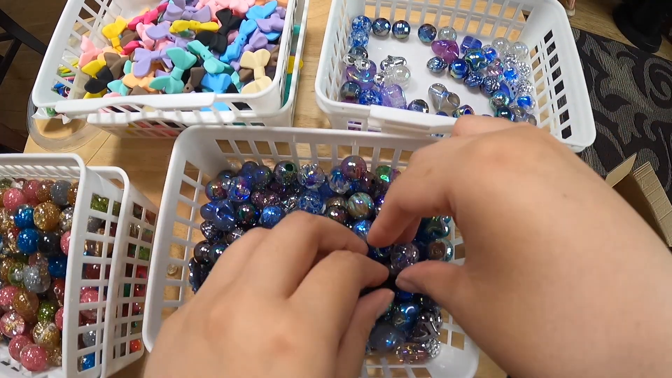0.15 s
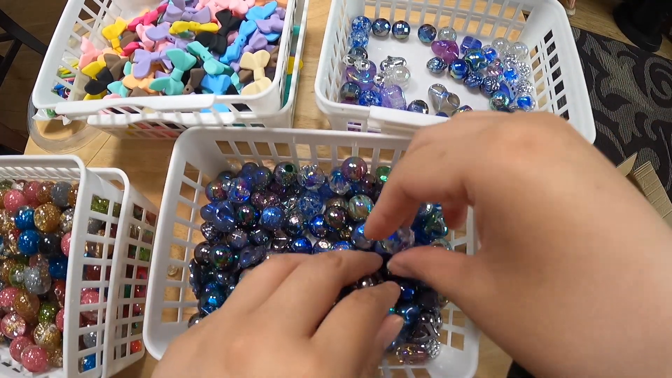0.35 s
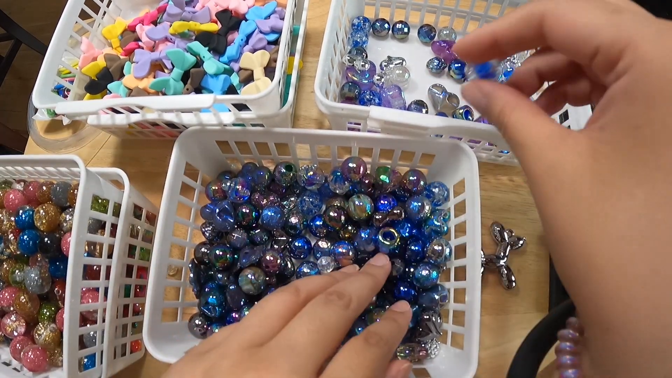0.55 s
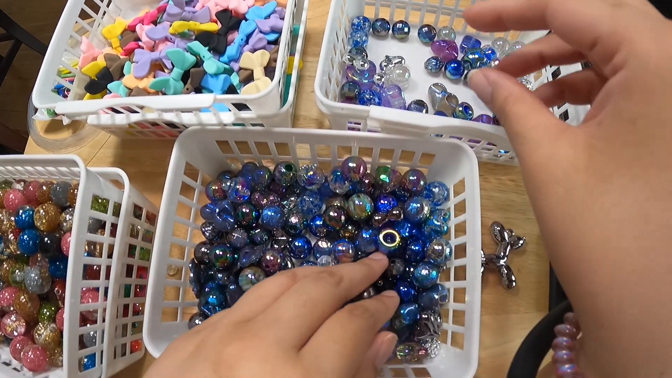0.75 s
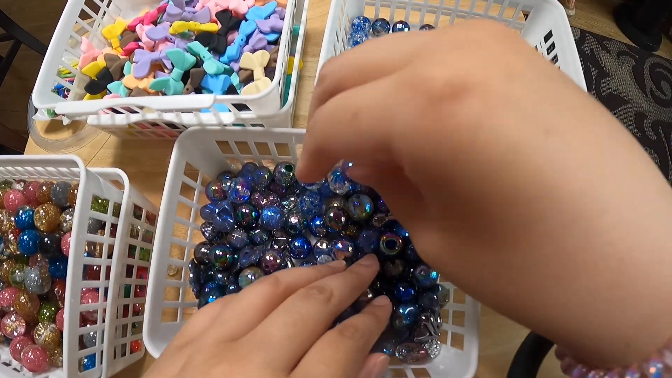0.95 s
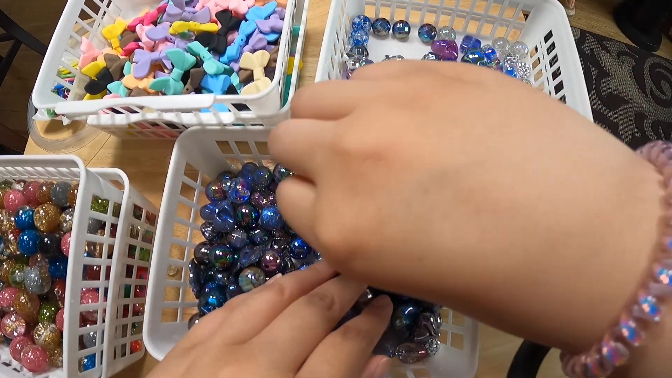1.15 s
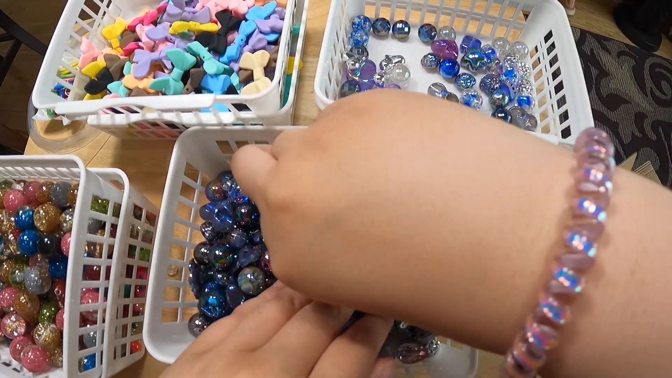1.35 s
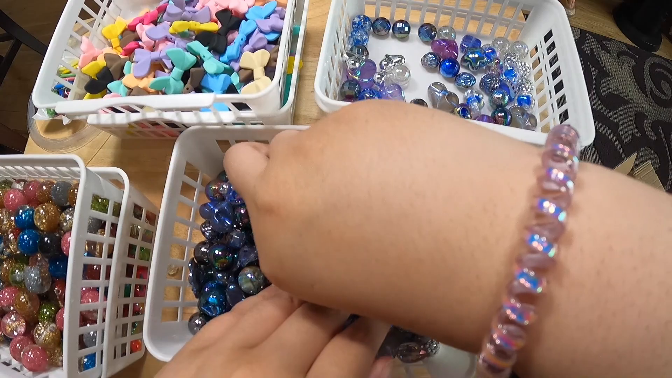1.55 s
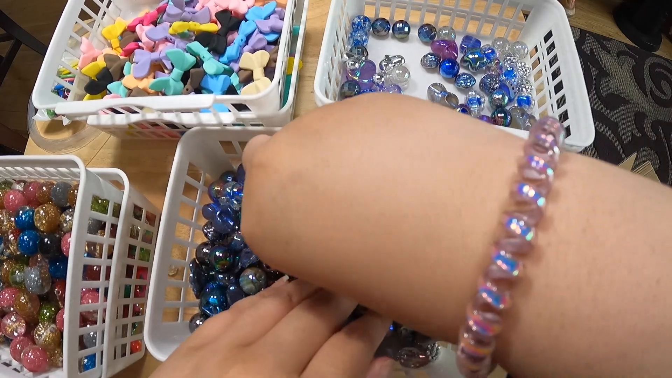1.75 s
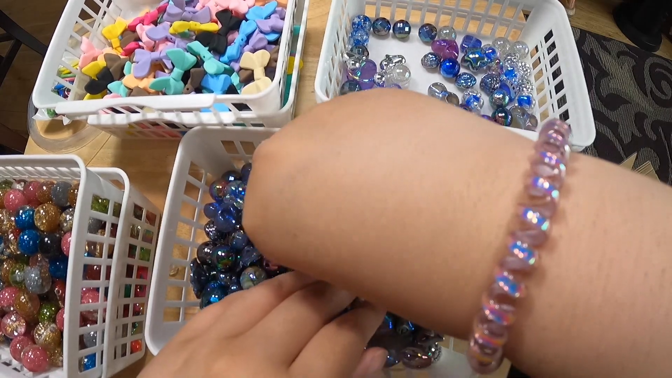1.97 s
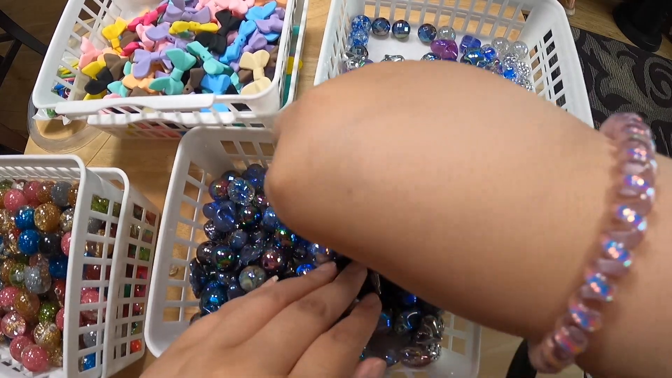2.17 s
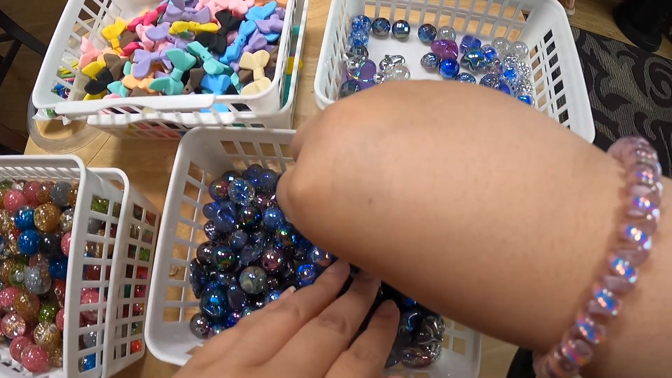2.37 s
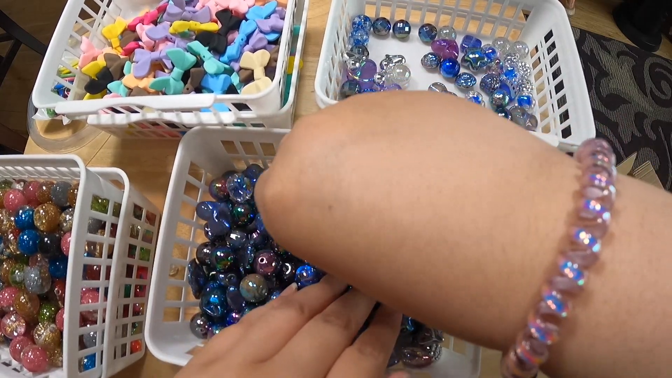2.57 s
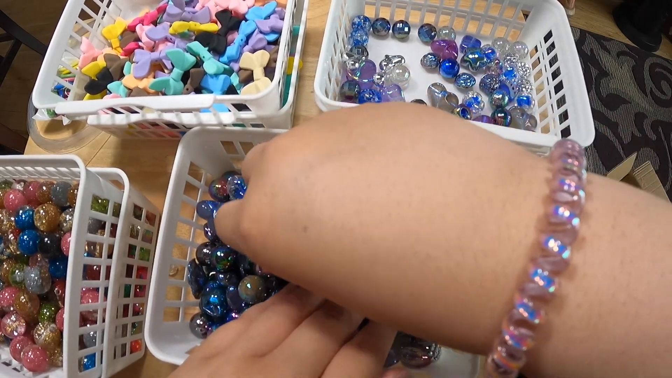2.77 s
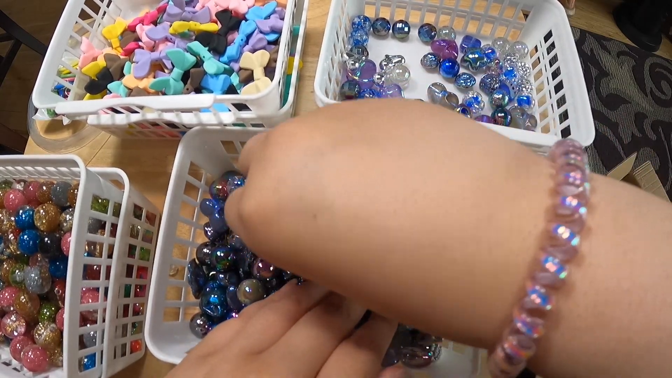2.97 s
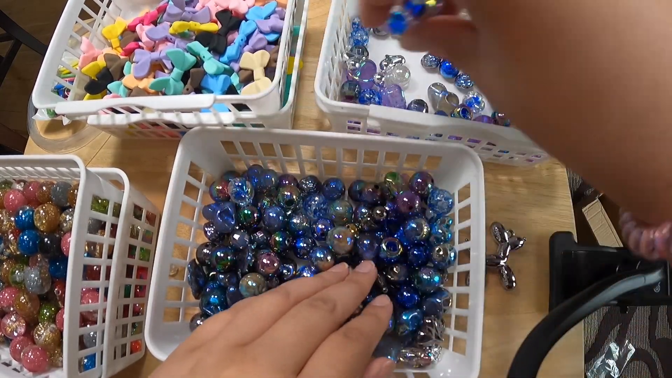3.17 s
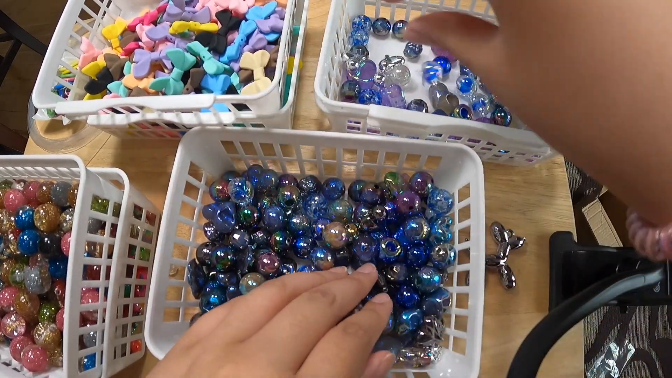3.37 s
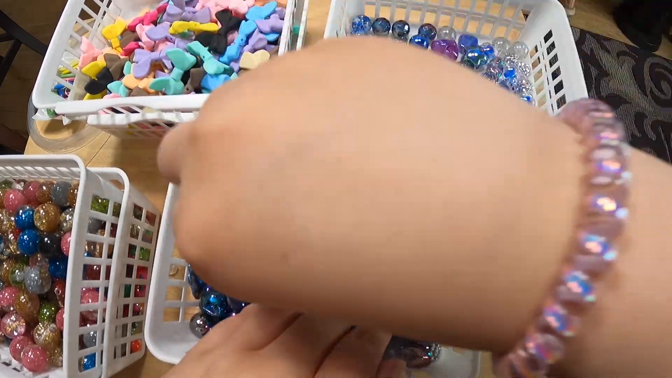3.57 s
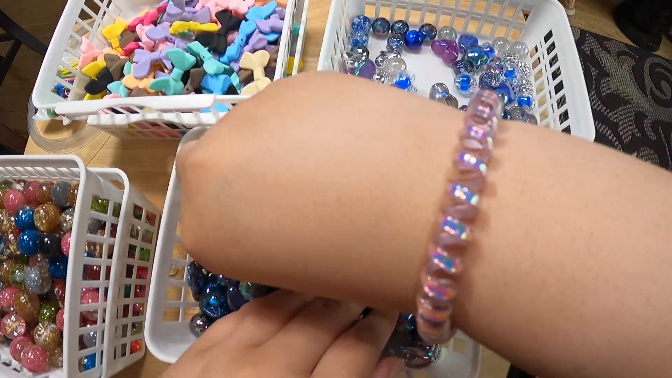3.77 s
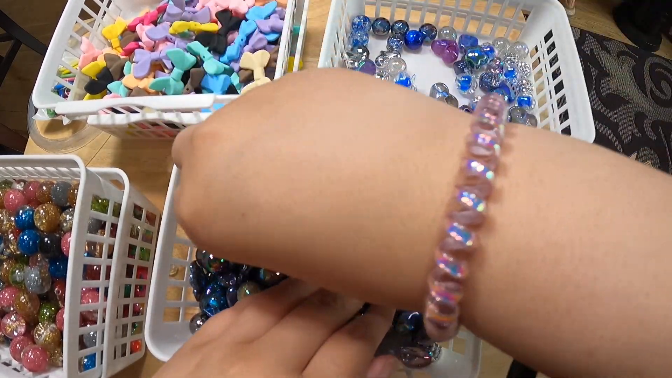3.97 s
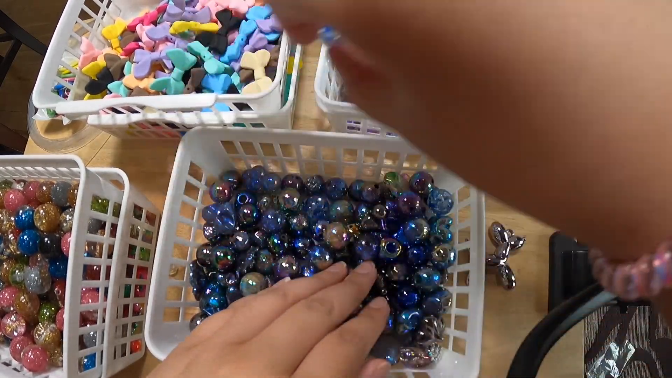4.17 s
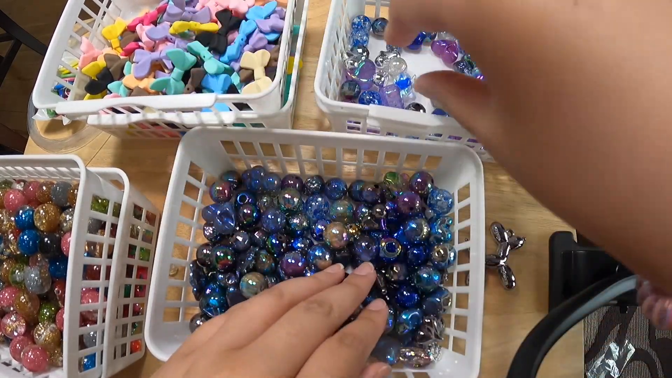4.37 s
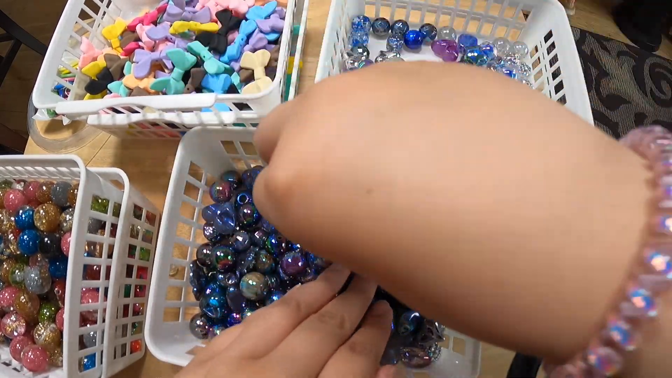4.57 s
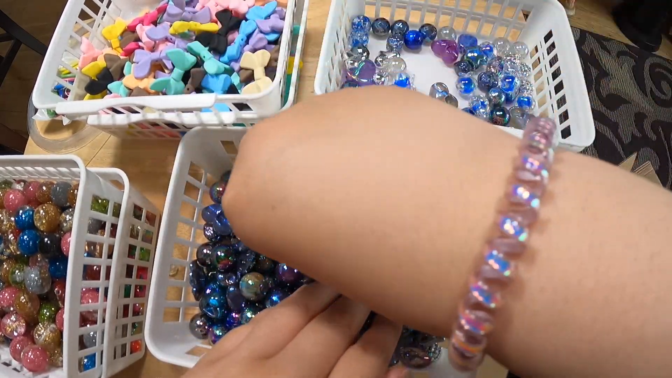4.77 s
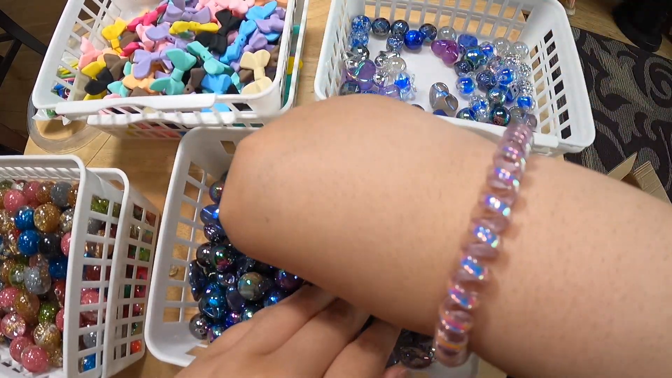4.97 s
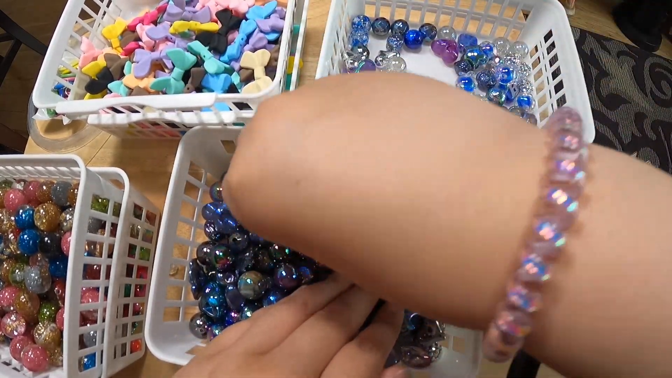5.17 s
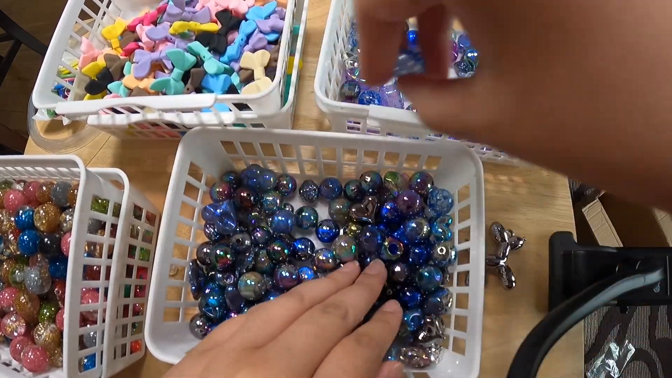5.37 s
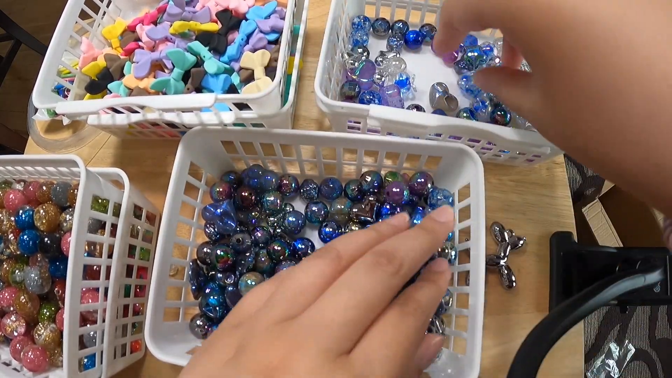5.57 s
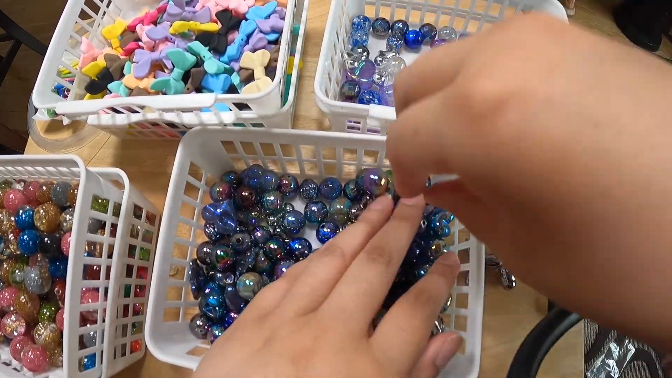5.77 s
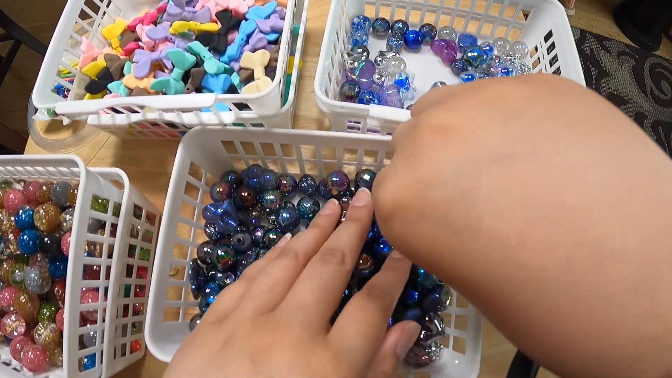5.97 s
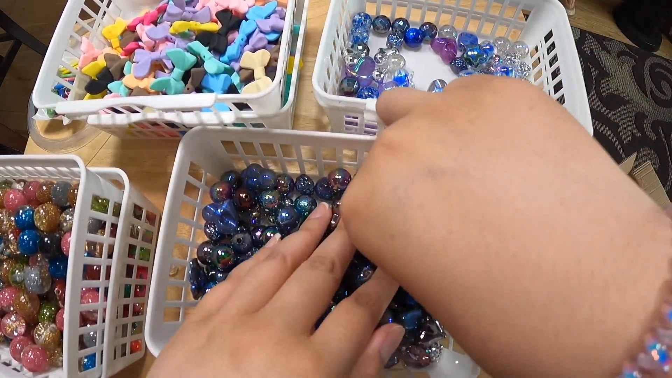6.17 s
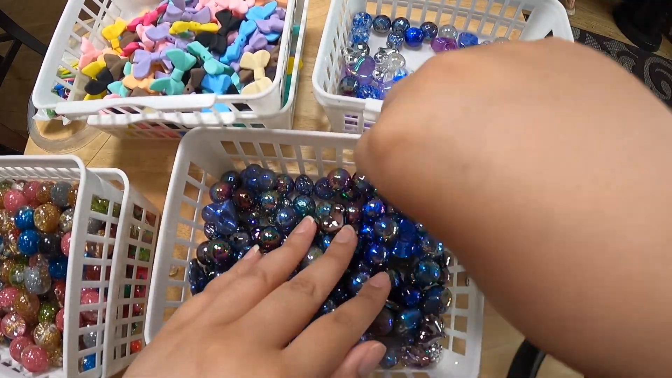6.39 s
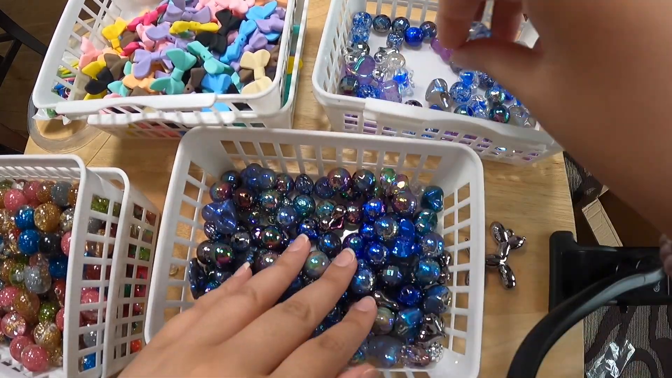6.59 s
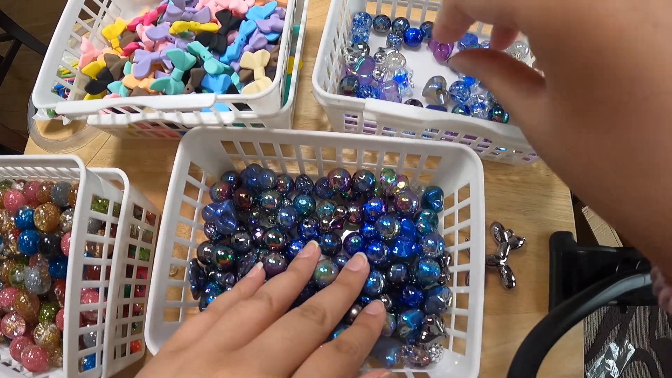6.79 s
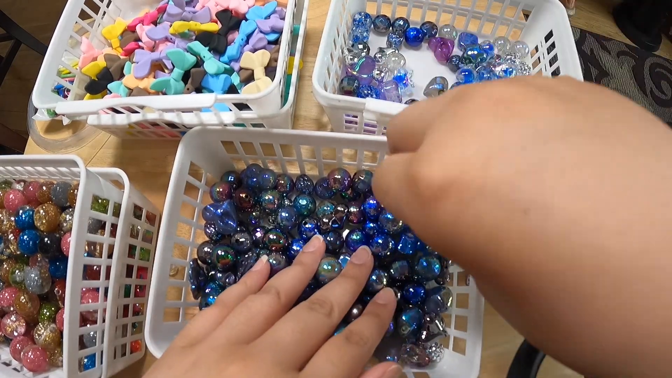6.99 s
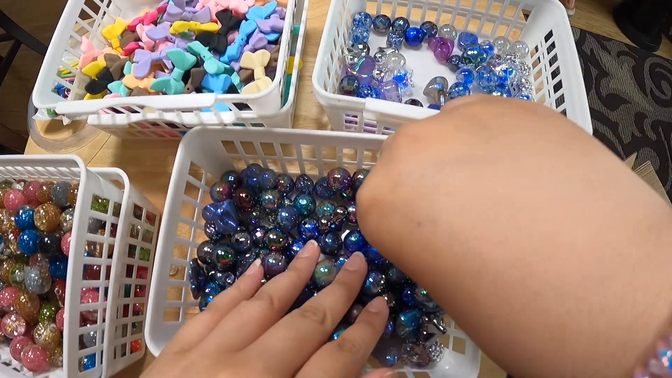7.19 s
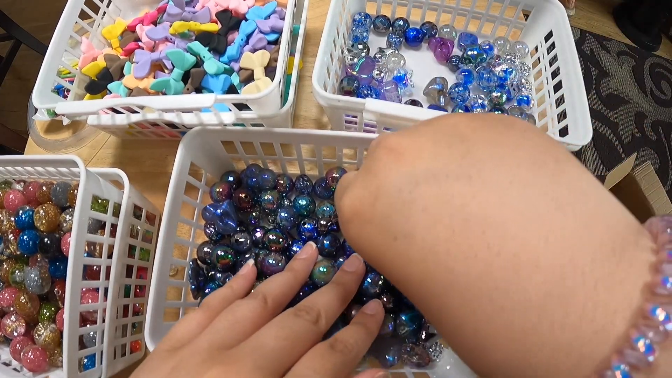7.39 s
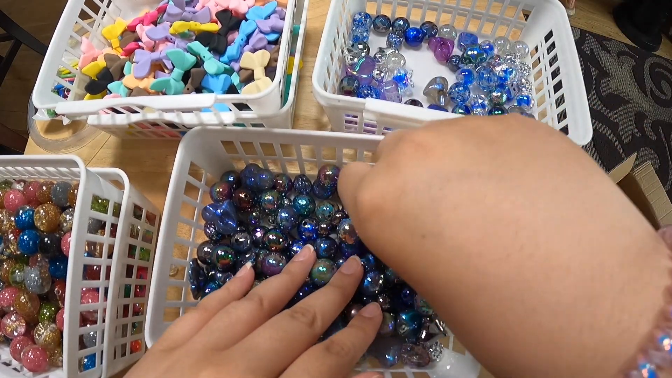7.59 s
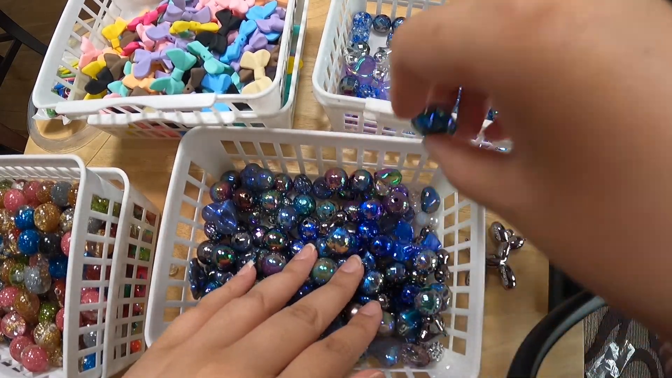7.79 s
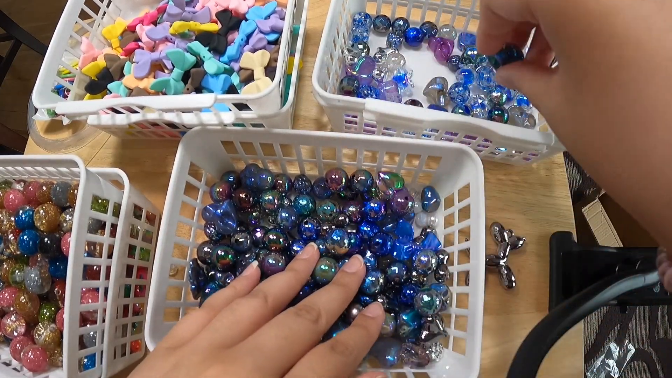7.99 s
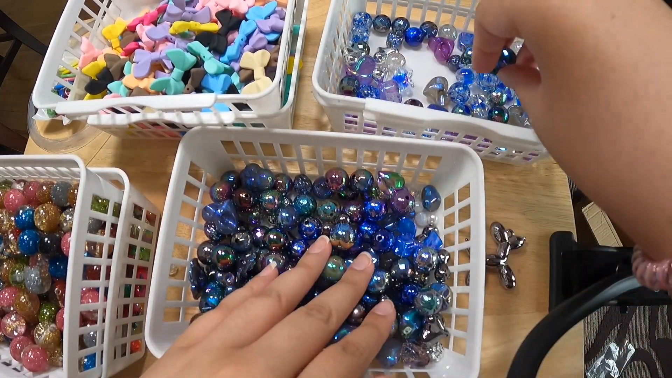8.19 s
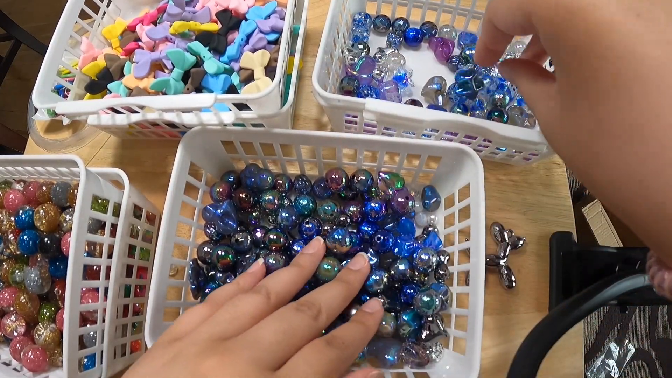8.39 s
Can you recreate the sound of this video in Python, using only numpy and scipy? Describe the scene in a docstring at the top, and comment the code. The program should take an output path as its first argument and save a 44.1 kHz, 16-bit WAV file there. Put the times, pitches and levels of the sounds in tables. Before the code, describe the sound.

Hard resin beads are stirred in a plastic basket very close to a stereo microphone in a dry room. From 0 s, a sharp cluster of clicks comes at once, then thins into scattered ticks until about 0.7 s. At 0.8 s beads land in an emptier basket slightly right, with a fast rebound, short roll and faint table thump. From 1 to 3.3 s the stirring grows denser and brighter, with dull knocks near 2.2 and 2.6 s. Further drops come at 3.4, 4.4, 5.6 and 6.8 s, between bursts of clicking and fine rattle, busiest around 5 to 6 s. A rush of rattling peaks near 7.5 s; after 7.9 s it quiens to sparse ticks before a last drop at 8.4 s. Soft room noise persists; a low beating engine drone sinks after 2.7 s and returns faintly near 7 s, briefly joined by a higher hum.

```python
"""Fingers stir a heap of hard resin beads in a plastic basket, close to a stereo microphone.
From the start, knocks ring heap and basket for milliseconds and shake the neighbours into a fine rattle.
At 0.8 s, and again at 3.4, 4.4, 5.6, 6.8 and 8.4 s, beads drop into an emptier basket off to the right.
Heavier blows add dull thumps. Behind lie filtered room noise and a low beating drone of summed sines,
probably a distant engine, which sinks after 2.7 s and returns near 7 s, soon joined by a short higher hum."""
import sys
import numpy as np
from scipy import signal
from scipy.fft import rfft, irfft, next_fast_len
from scipy.io import wavfile

SR = 44100
rng = np.random.default_rng(int(sys.argv[2]) if len(sys.argv) > 2 else 0)


def wav_record(signal):
    """Record a signal, one row per channel, as 16-bit PCM in the file named by sys.argv[1]."""
    frames = np.transpose(np.atleast_2d(signal))
    bounded = np.clip(frames, -1, 1)
    # unit amplitude maps onto the largest positive 16-bit level
    quanta = np.round(bounded * 32767).astype(np.int16)
    wavfile.write(sys.argv[1], SR, quanta)


def gain_from_db(level_db):
    """Turn a decibel level (scalar or array-like) into a linear amplitude factor."""
    decades = np.asarray(level_db, float) / 20
    return 10 ** decades


N = 372204


def in_time(rows):
    """Columns of a curve table whose first column is seconds, one value a sample."""
    s, *columns = np.transpose(rows)
    return [np.interp(np.arange(N) / SR, s, column) for column in columns]


def at_hz(points, hz):
    """Read a spectrum on a log-frequency axis."""
    point_hz, value = np.transpose(points)
    return np.interp(np.log(hz), np.log(point_hz), value)


def rms_one(x):
    """Scale to rms 1."""
    return x / np.sqrt(np.mean(x ** 2) + 1e-20)


def drift(rate_hz):
    """Slow chance with spread 1: noise through two equal low-pass poles, drawn every 40 samples."""
    r = np.exp(-80 * np.pi * rate_hz / SR)
    slow = signal.lfilter([1], [1, -2 * r, r * r], rng.standard_normal(N // 40 + 2002))[2000:]
    return np.interp(np.arange(N) / 40, np.arange(len(slow)), rms_one(slow))


def ring(clicks, hz, t60):
    """A unit click sets a dying sine of height 1 ringing; t60 in seconds."""
    r, w = gain_from_db(-60 / (t60 * SR)), 2 * np.pi * hz / SR
    return signal.lfilter([np.sin(w)], [1, -2 * r * np.cos(w), r * r], clicks + 1e-18)


# The clearest bead knocks, close to the microphone.
# Each row: start in seconds, relative level in dB, favoured pitch in Hz.
BEAD_KNOCKS = [(0.1336, -19.5, 1580), (0.139, -10.5, 2720), (0.1452, -3.5, 1880), (0.1707, -21, 2500),
               (0.2043, -16, 1030), (0.235, -12, 2220), (0.2697, -21, 1600), (0.3018, -15, 1870),
               (0.3119, -22, 1730), (0.3805, -17, 2500), (0.3905, -34, 2270), (0.452, -18.5, 1900),
               (0.552, -19, 3000), (0.5873, -21, 1630), (.635, -32, 2500), (.66, -30, 1600),
               (0.682, -15, 1642), (.7, -42, 2500), (.745, -32, 3000), (0.8757, -6.5, 1600),
               (0.9353, -12.5, 2360), (1.029, -7.5, 1610), (1.0337, -8.5, 1620), (1.0657, -15.5, 1486),
               (1.0917, -18, 1582), (1.105, -14.5, 1500), (1.1604, -31, 1210), (1.2239, -8, 1230),
               (1.2848, -13, 1153), (1.2912, -8, 2450), (1.3103, -13.5, 3220), (1.3165, -14, 3150),
               (1.3355, -18, 2188), (1.4715, -12.5, 3210), (1.535, -25, 2350), (1.5912, -11.5, 3770),
               (1.6205, -20, 1263), (1.6282, -16, 3244), (1.681, -10, 2930), (1.6902, -12, 3150),
               (1.6956, -10.5, 2380), (1.7303, -34, 2380), (1.759, -9, 3530), (1.8014, -7, 3500),
               (1.838, -12.5, 1940), (1.873, -10, 2500), (1.894, -8.5, 2658), (1.9146, -7, 3450),
               (1.9433, -17, 1366), (2.0377, -8, 2340), (2.0463, -6, 3350), (2.0728, -10, 2310),
               (2.1043, -15.5, 3370), (2.2078, -2.5, 3500), (2.24, -3.5, 3370), (2.3098, -18, 1310),
               (2.318, -11, 1280), (2.3385, -12, 1700), (2.3843, -9.5, 3078), (2.4078, -9, 2952),
               (2.4584, -7, 3230), (2.4675, -5, 2915), (2.4995, -3, 2014), (2.5962, -1.5, 2871),
               (2.6217, -5, 2918), (2.6837, -8.5, 3370), (2.6915, -12, 1110), (2.861, -12.5, 1360),
               (2.8799, -14.5, 1182), (2.928, -12, 2350), (2.9497, -16, 1605), (3.0265, -7, 3040),
               (3.081, -7.5, 1250), (3.1076, -5.5, 2708), (3.1507, -12.5, 1252), (3.2415, -16.5, 3070),
               (3.3557, -8.5, 2453), (3.3652, -14, 2520), (3.4275, -19, 2604), (3.431, -5, 1522),
               (3.4613, -6, 1630), (3.473, -12.5, 1630), (3.508, -10, 2500), (3.512, -5.5, 1510),
               (3.5548, -19, 1377), (3.7707, -14.5, 3613), (3.8663, -7.5, 2367), (3.9225, -16, 2900),
               (3.9573, -18, 3905), (3.9893, -8, 3533), (4.072, -9, 1250), (4.0859, -27, 1880),
               (4.1043, -6, 1384), (4.1167, -8, 3377), (4.1225, -5, 3200), (4.13, -14, 2500),
               (4.135, -9, 1312), (4.169, -15, 1250), (4.1818, -16.5, 1240), (4.218, -7, 1250),
               (4.3113, -14.5, 1242), (4.3222, -27, 2630), (4.4908, -17.5, 1425), (4.5177, -3.5, 2670),
               (4.6124, -14.5, 1646), (4.62, -11.5, 5500), (4.6436, -11.5, 1626), (4.6516, -13.5, 2536),
               (4.7225, -6.5, 3574), (4.7283, -8, 2264), (4.7585, -22, 2300), (4.81, -28, 2131),
               (4.8969, -2, 1817), (4.91, -11, 3615), (5.011, -11.5, 2982), (5.0399, -13, 3919),
               (5.0617, -9.5, 2432), (5.0704, -9, 3920), (5.0844, -14, 2313), (5.104, -6.5, 2240),
               (5.1467, -19.5, 2276), (5.1642, -6, 2230), (5.184, -14, 1997), (5.2124, -17.5, 2043),
               (5.2381, -5.5, 2334), (5.2601, -2, 2807), (5.313, -11.5, 3460), (5.3231, -3.5, 2680),
               (5.3542, -11, 3232), (5.4155, -8.5, 3570), (5.4476, -8.5, 2380), (5.4738, -11.5, 2800),
               (5.5173, -5.5, 2080), (5.6016, -14, 1117), (5.7393, -9, 1856), (5.7599, -6.5, 1633),
               (5.7967, -14, 3100), (5.8148, -14, 1674), (5.9015, -12, 2500), (5.9101, -10, 2702),
               (5.9386, -19, 1703), (5.9936, -3.5, 2500), (6.014, -9, 2450), (6.0276, -1.5, 2820),
               (6.1, -12.5, 2570), (6.1198, -19, 4190), (6.1268, -13, 4640), (6.1553, -11.5, 2890),
               (6.292, -9.5, 2282), (6.3383, -19.5, 3450), (6.3688, -13, 1124), (6.3826, -6.5, 3540),
               (6.397, -16, 1560), (6.4703, -19, 2175), (6.4915, -10, 1990), (6.6734, -13, 1170),
               (6.6964, -6, 2027), (6.799, -14, 1216), (6.8345, -12, 4227), (6.864, -8, 2847),
               (6.8965, -8.5, 1637), (6.9315, -9, 2900), (6.9345, -10, 1635), (6.9913, -19.5, 1270),
               (7.075, -23.5, 4010), (7.16, -9, 1439), (7.1727, -14.5, 3260), (7.1802, -7, 3902),
               (7.19, -13, 3810), (7.1996, -4, 4480), (7.2324, -8.5, 3360), (7.247, -6, 1134),
               (7.3256, -19.5, 2300), (7.3476, -21, 2316), (7.3935, -24.5, 4140), (7.4867, -11, 2233),
               (7.509, -11.5, 2622), (7.5177, -10, 3750), (7.5256, -7.5, 2270), (7.5323, -10, 2250),
               (7.5434, -5.5, 1278), (7.6296, -21, 1240), (7.6825, -10, 3803), (7.694, -10.5, 1169),
               (7.749, -13.5, 3828), (7.799, -5.5, 4114), (7.8025, -12, 3614), (7.81, -11, 1295),
               (7.8197, -12.5, 4190), (7.831, -18, 4085), (7.8635, -11.5, 3430), (7.8708, -17, 3530),
               (7.9246, -4, 3813), (8.2224, -19, 2273), (8.2473, -16.5, 2042), (8.4335, -3, 2677)]
# Beads dropped into the emptier basket, off to the right. Each row: start in seconds, relative level in dB,
# how long they roll on in seconds, rattle level in dB, seconds for that rattle to fade 20 dB.
BEAD_DROPS = [(0.7725, -1, 0.33, -33, 0.17), (3.383, -0.5, 0.22, -36.5, 0.65), (4.424, 0.5, .24, -32, .5),
              (5.648, -2, .2, -34.5, 1.2), (6.812, -2.5, .14, -27.5, 0.5), (8.419, -3, 0.021, -28.5, 3)]
REBOUND_S, REBOUND_DB, FLOOR_HZ = 0.0053, -5.5, 1600   # second touch of each drop; pitch of the basket floor


def hits():
    """Knocks, drops and the one rebound of each drop in time order: seconds, dB, pitch in Hz."""
    landings = []
    for s, db, *_ in BEAD_DROPS:
        landings += [(s, db, FLOOR_HZ), (s + REBOUND_S, db + REBOUND_DB, FLOOR_HZ)]
    return np.transpose(sorted(BEAD_KNOCKS + landings))


def dropping():
    """True while beads land and roll in the emptier basket."""
    s = np.arange(N) / SR
    spans = [(s > start - 0.01) & (s < start + roll) for start, _, roll, *_ in BEAD_DROPS]
    return np.any(spans, axis=0)


def knocks():
    """The clear contacts, louder ones harder: sample, dB, pitch, dB of favour, treble dB."""
    s, db, pitch = hits()
    treble_db = -9.5 + 0.57 * db + 0.85 * rng.standard_normal(len(s))
    return np.round(s * SR).astype(int), db - 3.5, pitch, np.full(len(s), 8.5), treble_db


# Beads slip quickly, then settle. Each row: moment when the slide is loudest in seconds,
# rattle level at that moment in dB, seconds to fade 20 dB (0.005 at least).
BEAD_SLIDES = [(.15, -36, 0.41), (.205, -32.5, 0.22), (.305, -34, 0), (0.381, -36, 0.15),
               (0.891, -33.5, 0.13), (1.037, -37, 0.05), (1.294, -22.5, -0.2), (1.693, -33.5, 0.43),
               (2.05, -29.5, .5), (2.323, -35, 0.1), (2.472, -26, 0.19), (2.694, -29, 0.12),
               (2.795, -30, 0.08), (2.89, -28, -0.02), (3.777, -38, 0.74), (4.12, -23, -0.23),
               (4.526, -30, 0.26), (4.736, -24, 0.21), (5.329, -29, 0.3), (5.693, -31.5, 1.02),
               (6.214, -29.5, 0.08), (7.155, -30, 0.35), (7.54, -19, 0.04), (7.812, -26.5, -0.11)]
# Fingers plough in, then stop. Each row: moment when the push is loudest in seconds,
# rattle level at that moment in dB, seconds to build 20 dB (0.005 at least).
FINGER_PUSHES = [(1.415, -32.5, 0.67), (1.928, -33.5, 0.84), (2.234, -29, 0.54), (2.616, -33.5, 1.39),
                 (3.144, -36, 0.86), (3.51, -28, 0.1), (3.711, -34, 0.1), (3.963, -30, 0.04),
                 (4.81, -31, 0.29), (4.96, -30, 0.06), (5.25, -30.5, 0.51), (5.59, -33, 0.33),
                 (6.01, -25.5, 0.24), (6.38, -28, 0.11), (6.49, -31, 0.06), (7.245, -26.5, 0.19),
                 (7.406, -36.5, 0.16), (7.71, -33, 0.3), (8.274, -37.5, -0.07)]
# seconds for a slide to build 20 dB, for a push to fade 20 dB; rattle of the heap left alone
SLIP_S, STOP_S, REST_DB = 0.025, 0.04, -63.5


def stirring():
    """Rattle dB: the loudest slide, push or rolling drop at each moment; drops fade fast when their roll ends."""
    t, out = np.arange(N) / SR, np.full(N, float(REST_DB))
    moves = [(s, db, SLIP_S, fade, np.inf) for s, db, fade in BEAD_SLIDES]
    moves += [(s, db, build, STOP_S, np.inf) for s, db, build in FINGER_PUSHES]
    moves += [(s + REBOUND_S, db, REBOUND_S, fade, s + roll) for s, _, roll, db, fade in BEAD_DROPS]
    for s, db, rise, fall, end in moves:
        slope = np.maximum((s - t) / max(rise, 0.005), (t - s) / max(fall, 0.005))
        slope = slope + np.maximum(t - end, 0) / STOP_S
        out = np.maximum(out, db - 20 * slope)
    return out


def rattle(per_s, shaken_db, settle_s):
    """Small random contacts follow the stirring, swell after each hit and lie near the last hit's pitch."""
    s, db, pitch = hits()
    jolts = np.zeros(N)
    jolts[np.round(s * SR).astype(int)] = gain_from_db(db + shaken_db)
    shaken = signal.lfilter([1], [1, -np.exp(-1 / (settle_s * SR))], jolts)
    stirred = gain_from_db(stirring() + 4.0 * drift(25.0))
    in_drop = dropping()
    # rolling or busy beads touch more often and more lightly
    rolling = np.where(in_drop, 3.0, 1) * (stirred / gain_from_db(-40)) ** 0.55
    at = np.flatnonzero(rng.random(N) < rolling * per_s / SR)
    size_db = 3.32 * np.minimum(rng.exponential(1, len(at)), 2.4)
    level_db = 10 * np.log10((stirred ** 2 + shaken ** 2) / rolling)[at] + size_db + 1.43
    last = np.maximum(np.searchsorted(s, at / SR) - 1, 0)
    near_pitch = pitch[last] * (1 + 0.11 * rng.standard_normal(len(at)))
    pitch = np.where(in_drop[at], FLOOR_HZ, near_pitch)   # the emptier basket rings with its floor
    favour_db = np.where(in_drop[at], 9.0, 4.0)
    treble_db = -16 + 1.0 * rng.standard_normal(len(at))
    return at, level_db, pitch, favour_db, treble_db


# What beads and basket ring with. Each row: frequency in Hz, relative level in dB, t60 in seconds.
HEAP_RESONANCES = [(1014, -11.5, 0.017), (1250, -5.5, 0.011), (1633, -7.5, 0.0092), (1988, -3, 0.0056),
                   (2500, -2, 0.0083), (3147, -2, 0.0069), (3803, -2.5, 0.0063), (4660, -3, 0.0057),
                   (5660, -6, 0.0048), (6965, -5.5, 0.0047), (8460, -18.5, 0.012), (10440, -21, 0.0086),
                   (12150, -27.5, 0.0067)]
# Slow course of the contacts' hardness. Each row: time in seconds, treble in dB before weighting.
CONTACT_TREBLE = [(0, -6.5), (2.6, -5), (4.3, -3), (5.5, -3.2), (8.3, -3)]


def strike(at, level_db, pitch, favour_db, treble_db, pan_db, detune, scatter_db):
    """Every contact shares its energy among the modes, with own signs, directions and shifted pitches."""
    out = np.zeros((2, N))
    hz, db, t60 = np.transpose(HEAP_RESONANCES)[:, :, None]
    strength, sign, tuning, beam = rng.random((len(at), len(hz), 4)).T
    octaves = np.log2(hz / pitch)
    # modes below the favoured pitch speak less
    favoured = favour_db * np.exp(-(octaves / 0.13) ** 2) + 3.14 * octaves.clip(-1.5, 0)
    # a harder contact lifts the high modes
    hardness = 1.38 * (treble_db + 15.5 + in_time(CONTACT_TREBLE)[0][at])
    hard = hardness * np.clip(np.log2(hz / 3000), 0, 1)
    shares = gain_from_db(db + favoured + hard + scatter_db * (2 * strength - 1))
    sizes = gain_from_db(level_db) * np.sign(sign - 0.5) * shares / np.sqrt(np.sum(shares ** 2, axis=0))
    # high modes beam unevenly
    aim_db = pan_db * (hz < 8000) + (1.7 + 12.5 * (hz / 10000) ** 2) * (2 * beam - 1)
    # a mode near the favoured pitch settles on it, the others fall on any of five tunings
    asked = np.round((pitch / hz - 1) / detune)
    steps = np.where(abs(asked) <= 2, asked, np.floor(5 * tuning) - 2)
    for m in range(len(hz)):
        sides = sizes[m] * gain_from_db(np.outer([0.5, -0.5], aim_db[m]))
        for step in range(-2, 3):
            mine = steps[m] == step
            clicks = np.zeros((2, N))
            np.add.at(clicks, (slice(None), at[mine]), sides[:, mine])
            out += ring(clicks, hz[m, 0] * (1 + detune * step), t60[m, 0])
    return out


def basket_echoes(x, echo_db, hold_s, t60):
    """Walls, table and hands throw back a spray of close echoes, redrawn 40 times a second."""
    size, out = SR // 40, x.copy()
    s = np.arange(size) / SR
    envelope = gain_from_db(-60 * np.maximum(s - hold_s, 0) / t60) * (s > 0.0003)   # lasts a moment, then dies fast
    for start in range(0, N, size):
        # mostly common to both sides
        spray = rng.standard_normal(size) + 0.17 * rng.standard_normal((2, size))
        spray = spray * envelope
        spray = gain_from_db(echo_db) * spray / np.sqrt(np.sum(spray ** 2, axis=1, keepdims=True))
        echoes = signal.fftconvolve(x[:, start:start + size], spray, axes=1)[:, :N - start]
        out[:, start:start + echoes.shape[1]] += echoes
    return out


def radiate(beads):
    """Beads and basket are too small to radiate bass; the contact is too long for the top octave."""
    beads = signal.sosfilt(signal.butter(4, 863, "high", fs=SR, output="sos"), beads)
    return signal.sosfilt(signal.butter(2, 7850, fs=SR, output="sos"), beads)


# Phase by which the left microphone port lags the right. Each row: frequency in Hz, lag in radians.
PORT_LAG = [(1000, 0), (2800, 0.7), (5000, 0.45), (9000, 0)]


def reach_microphones(beads):
    """Half the phase lag goes to each port, with opposite signs."""
    lag = at_hz(PORT_LAG, np.arange(1, N // 2 + 2) * SR / N)
    return irfft(rfft(beads) * np.exp(np.outer([-0.5j, 0.5j], lag)), N)


# The table top under the baskets. Each row: frequency in Hz, relative level in dB, t60 in seconds.
TABLE_RESONANCES = [(141.6, -38.5, 0.32), (226, -37.5, 0.076)]


def table_thumps(rise_s):
    """Hits in the emptier basket shake the table top, which swells softly and sounds from the right."""
    s, db, _ = hits()
    at, pushes = np.round(s * SR).astype(int), np.zeros(N)
    pushes[at] = gain_from_db(db) * dropping()[at]
    r = np.exp(-1 / (rise_s * SR))
    pushes = signal.lfilter([1 - r], [1, -r], pushes)
    return sum(gain_from_db(db) * ring(pushes, hz, t60) for hz, db, t60 in TABLE_RESONANCES) * gain_from_db([[-4], [3]])


# Heavier blows that reach the basket wall and table.
# Each row: start in seconds, level in dB, frequency in Hz.
HEAVY_BLOWS = [(0.666, -27.5, 267.5), (2.208, -27, 525), (2.597, -28, 561), (5.164, -28, 381.6),
               (5.26, -25.5, 580), (5.994, -27.5, 599.5), (6.835, -33, 265)]


def thumps():
    """Each heavy blow leaves a short dull ring that fades 60 dB in 7.8 cycles."""
    return sum(ring(gain_from_db(db) * (np.arange(N) == int(s * SR)), hz, 7.8 / hz) for s, db, hz in HEAVY_BLOWS)


def room(x, t60, wall_cut_hz):
    """Six feedback delays a side, duller on every round; t60 in seconds before the dulling."""
    out, size = np.zeros((2, N)), next_fast_len(N + SR)
    turn = np.exp(-2j * np.pi * np.arange(size // 2 + 1) / size)   # one sample of delay
    dull, spectrum = np.exp(-2 * np.pi * wall_cut_hz / SR), rfft(x, size)
    wall = (1 - dull) / (1 - dull * turn)
    lags = (rng.uniform(0.006, 0.03, (2, 6)) * SR).astype(int)
    for side in range(2):
        loops = [gain_from_db(-60 * lag / SR / t60) * wall * turn ** lag for lag in lags[side]]
        response = sum((-1) ** k * loop / (1 - loop) for k, loop in enumerate(loops))
        out[side] = irfft(spectrum * response, size)[:N]
    return out


# The far drone, probably a slow engine.
# Each row: time in seconds, fourth order in Hz, rms of the fourth order in dB, of the fifth in dB.
ENGINE_DRONE = [(0.0, 50.9, -32, -39.5), (0.4, 51.6, -31.5, -40.5), (0.8, 52.9, -56, -38),
                (1.0, 51.7, -61, -53.5), (1.2, 50.6, -56, -44.5), (1.55, 51.7, -30.5, -40),
                (1.8, 52.6, -39.5, -35), (2.35, 51.5, -35, -44), (2.75, 49.1, -62, -57.5),
                (6.8, 49.3, -76, -55.5), (6.95, 52.7, -41, -54), (7.05, 52.6, -34, -46),
                (7.2, 51.4, -57, -46), (7.35, 49.9, -43, -53), (7.6, 48.9, -58, -49),
                (7.85, 51.4, -48, -57), (8.05, 52.8, -42, -59), (8.4, 55.5, -45.5, -64.5)]
# Its growl. Each row: time in seconds, reference level of the orders from the eleventh up in dB.
ENGINE_GROWL = [(0, -53), (.8, -48), (1.1, -51.5), (1.6, -46.5), (2.9, -50.5), (3.3, -56.5), (6.9, -57),
                (7.6, -49.5)]
# Its weaker orders. Each entry: multiple of the turning rate, level in dB against the fifth order,
# or against the growl from the eleventh up.
WEAK_ORDERS_DB = {2: -30, 7: -11.5, 8: -15, 9: -16, 11: -6.5, 12: -6, 13: -3}
# A short higher hum behind the beads. Each row: time in seconds, frequency in Hz, rms in dB.
HIGH_HUM = [(7.35, 82.66, -50), (7.5, 83.75, -44), (7.75, 82.8, -43.5), (7.9, 81.4, -57)]


def drone():
    """Orders of a slow engine; fourth and fifth beat at its turning rate; a higher hum joins briefly."""
    hz, fourth_db, fifth_db = in_time(ENGINE_DRONE)
    turns = 2 * np.pi * np.cumsum(hz / 4) / SR
    out = gain_from_db(fourth_db) * np.sin(4 * turns) + gain_from_db(fifth_db) * np.sin(5 * turns)
    growl_db = in_time(ENGINE_GROWL)[0] + [[-2.5], [1.5]]   # stronger on the right
    for multiple, db in WEAK_ORDERS_DB.items():
        # higher orders differ more between the sides
        phase = rng.uniform(0, 2 * np.pi) + multiple * np.array([[0.06], [-0.06]])
        against_db = growl_db if multiple > 10 else fifth_db
        out = out + gain_from_db(against_db + db + 2.4 * drift(11.0)) * np.sin(multiple * turns + phase)
    (first_s, first_hz, _), (last_s, last_hz, _) = HIGH_HUM[0], HIGH_HUM[-1]
    hum_hz, hum_db = in_time([(first_s - 0.2, first_hz, -80), *HIGH_HUM, (last_s + 0.16, last_hz, -80)])
    hum = gain_from_db(hum_db) * np.sin(2 * np.pi * np.cumsum(hum_hz) / SR)
    return np.sqrt(2) * (out + hum)   # from rms to sine height


# Noise of the room all round. Each row: frequency in Hz, relative level in dB per Hz.
NOISE_SPECTRUM = [(13, -30), (22, 2.5), (92, -6), (186, -13.5), (346, -9.5), (594, -18), (915, -18.5),
                  (1080, -10.5), (1300, -18), (1850, -21), (2800, -29), (5590, -36), (14000, -74)]
# How alike it is at the two microphones. Each row: frequency in Hz, left-right correlation.
NOISE_LIKENESS = [(60, 0.88), (140, 0.98), (290, 0.96), (1000, 0.62), (10000, 0.29)]


def room_noise(level_db, patchy_db):
    """Third-octave bands of stereo noise, each with its own level, flicker and likeness; rms level_db."""
    out, edges = 0, 22 * 2 ** (np.arange(29) / 3)
    white = rng.standard_normal((2, 2, N + SR // 2))   # neighbouring bands take different noise
    for k, (low, high) in enumerate(zip(edges, edges[1:])):
        band = signal.butter(2, [low, high], "band", fs=SR, output="sos")
        mid, side = signal.sosfilt(band, white[k % 2])[:, -N:]
        hz = np.sqrt(low * high)
        alike = np.clip(at_hz(NOISE_LIKENESS, hz), -1, 1)
        gain = gain_from_db(at_hz(NOISE_SPECTRUM, hz) + patchy_db * drift(4.2))
        out = out + gain * (np.sqrt(1 + alike) * mid + np.sqrt(1 - alike) * side * [[1], [-1]])
    return gain_from_db(level_db) * rms_one(out)


def scene():
    """Beads close to the microphones, their echo in the room, and the background."""
    contacts = zip(knocks(), rattle(per_s=480, shaken_db=-26, settle_s=0.019))
    at, *character = [np.concatenate(pair) for pair in contacts]
    pan_db = np.where(dropping()[at], -3.0, -0.6)   # left over right
    beads = strike(at, *character, pan_db, detune=0.044, scatter_db=3.5)
    beads = basket_echoes(beads, echo_db=-3.5, hold_s=0.0024, t60=0.015)
    beads = reach_microphones(radiate(beads))
    near = beads + table_thumps(rise_s=0.00052) + thumps()
    echo = gain_from_db(-19) * room(beads.mean(axis=0), t60=0.065, wall_cut_hz=29000)
    return near + echo + room_noise(level_db=-43.5, patchy_db=2.0) + drone()


def roll_off(x):
    """The treble ends steeply here."""
    return signal.sosfilt(signal.butter(12, 16150, fs=SR, output="sos"), x)


def record(dry):
    """The microphone signal with its peaks rounded by a soft limit."""
    mix = 1.528 * np.tanh(dry / 1.276)
    return roll_off(mix)


dry = scene()
out = record(dry)
wav_record(out)
```